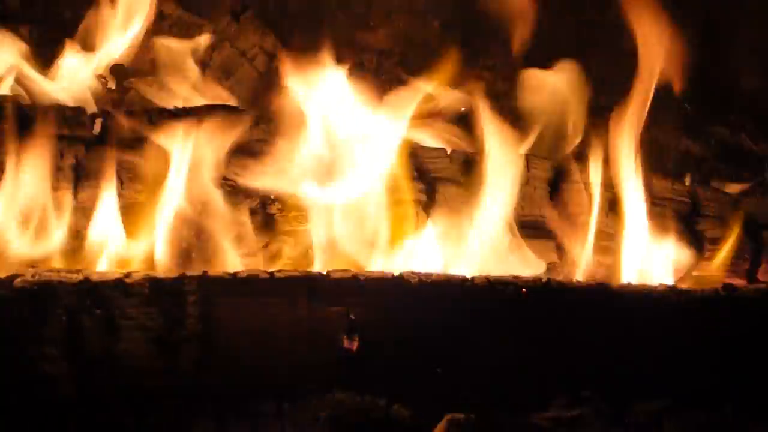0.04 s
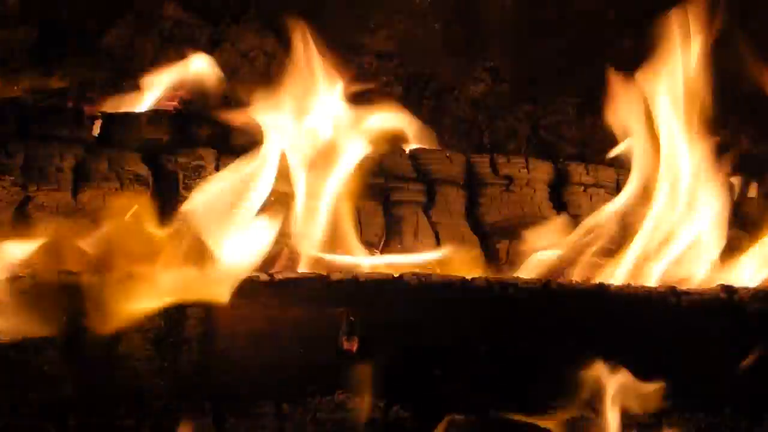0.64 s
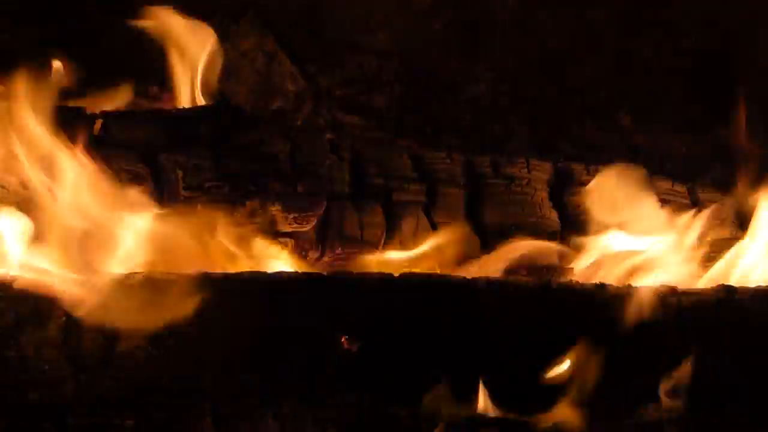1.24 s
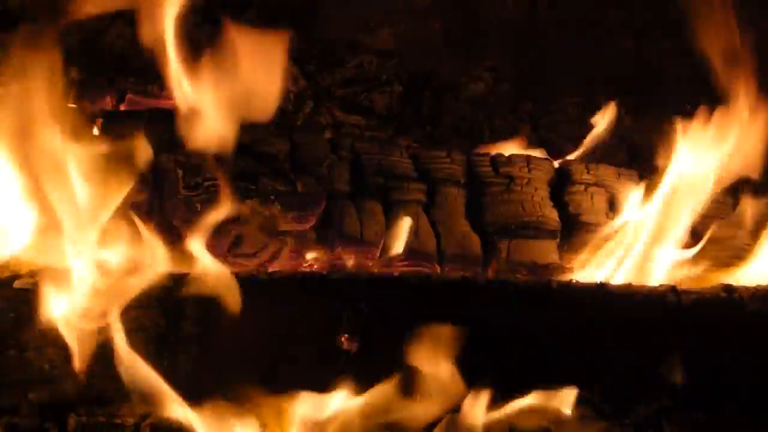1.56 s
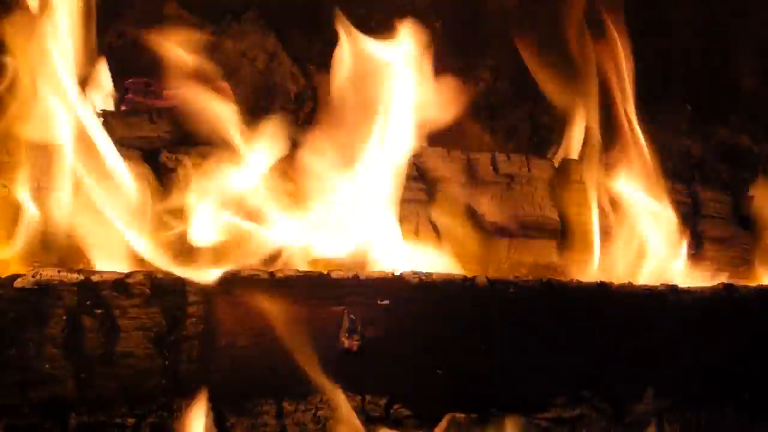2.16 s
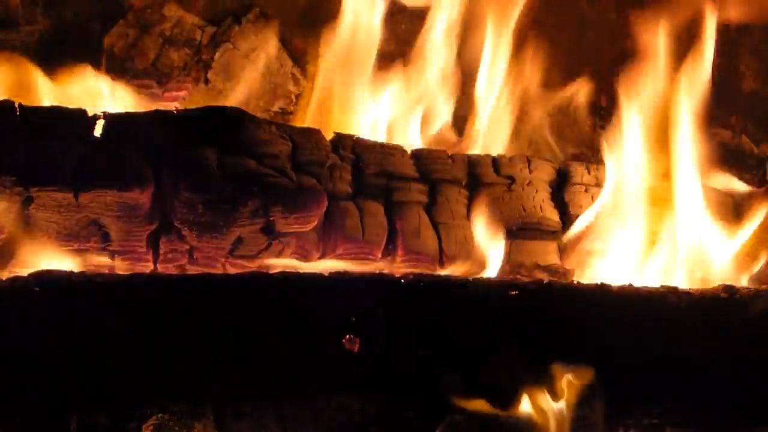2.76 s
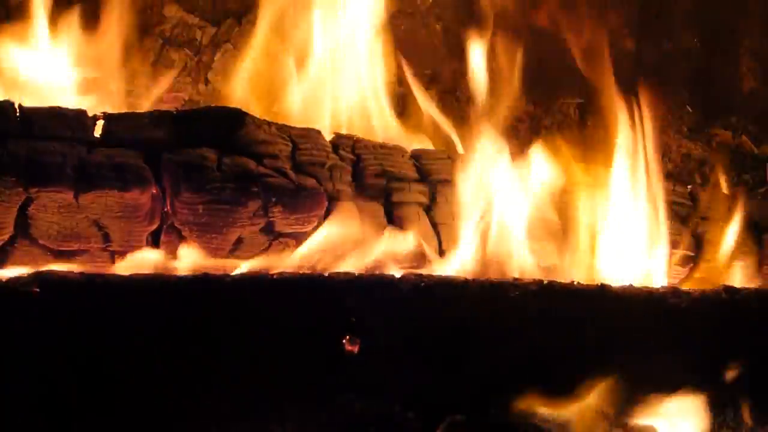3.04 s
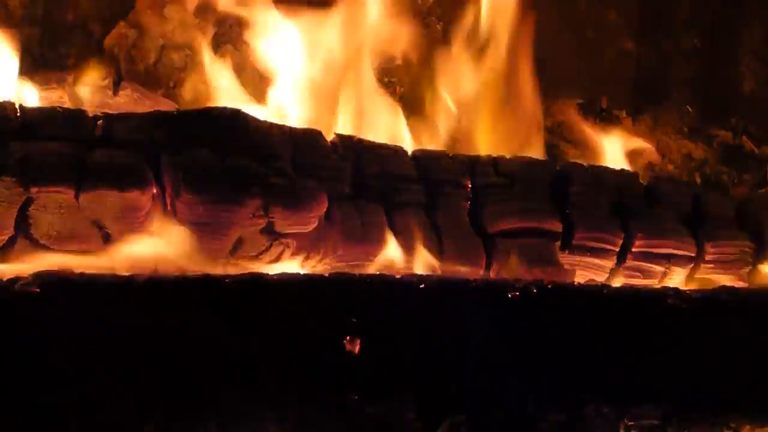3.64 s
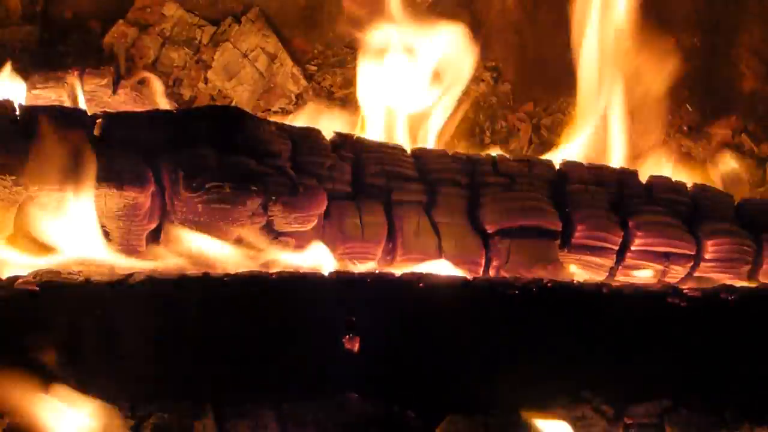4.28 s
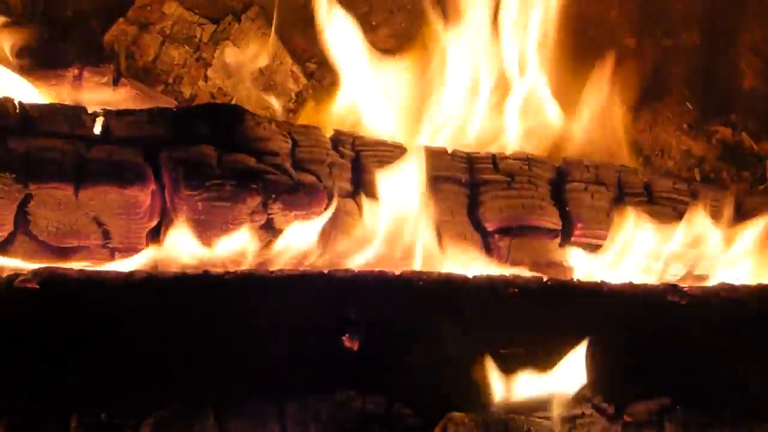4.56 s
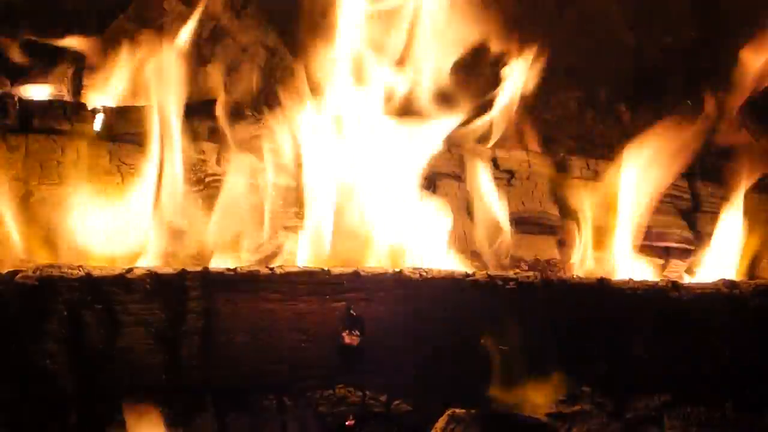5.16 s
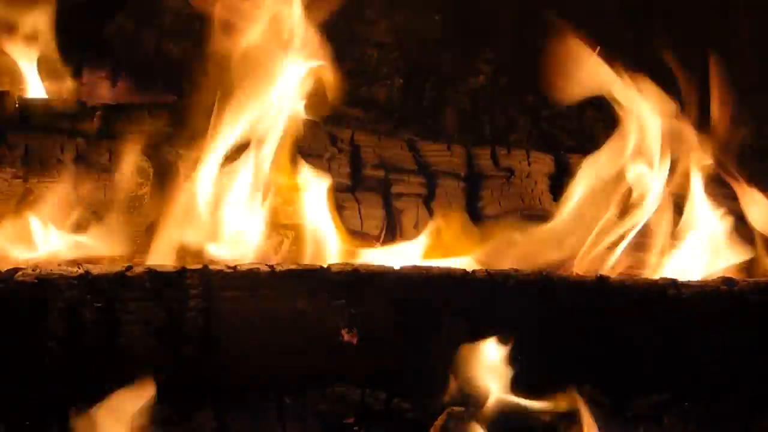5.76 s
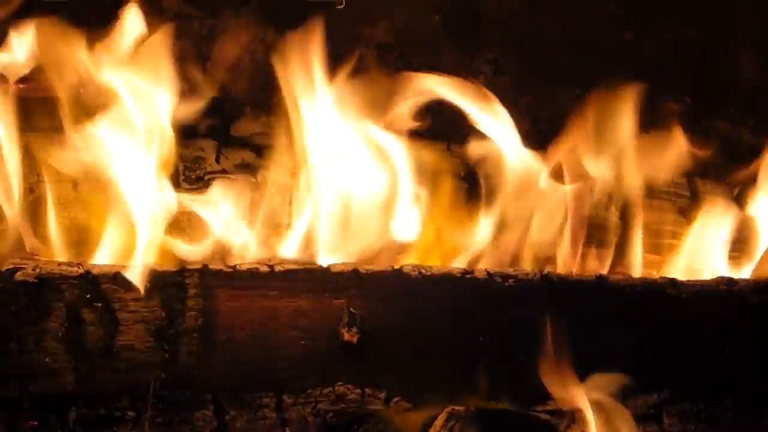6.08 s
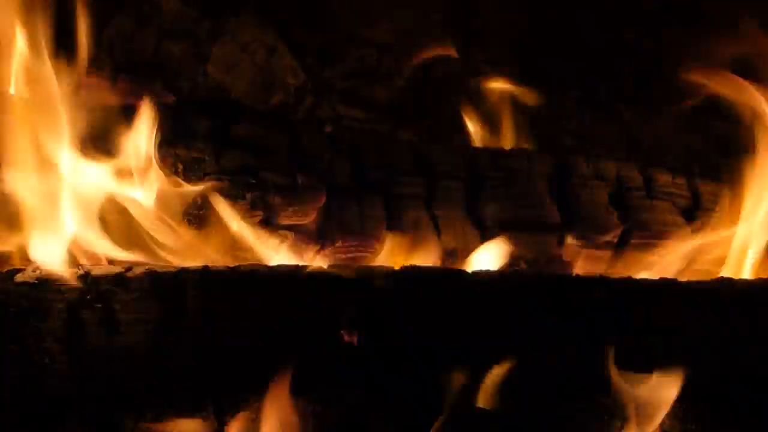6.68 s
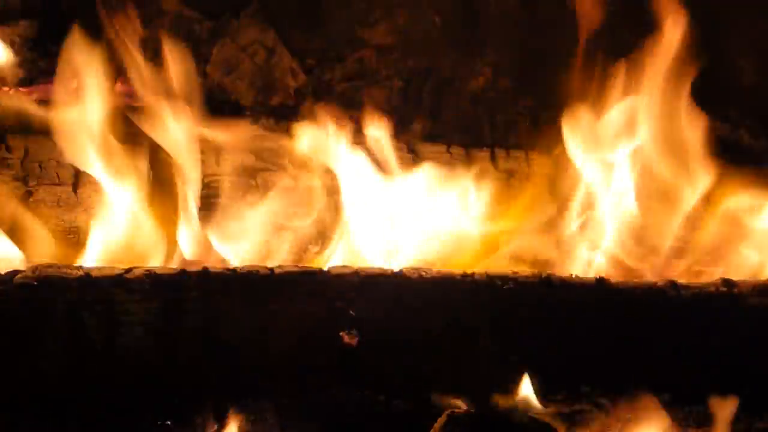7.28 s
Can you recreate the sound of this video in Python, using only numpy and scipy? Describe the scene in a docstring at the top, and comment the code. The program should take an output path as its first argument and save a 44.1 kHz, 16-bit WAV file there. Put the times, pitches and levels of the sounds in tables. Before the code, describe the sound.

Flames roar softly and flutter around burning logs in a hearth, heard from close by. Light, high crackles at the start give way to a loud snap, then a busier run of pops with short hisses of sap and a soft low drone. A second loud crack carries a dull wooden knock, and another cluster of snaps comes near the end. Faint ember ticks and a slight hum continue throughout.

```python
"""Sharp, dry pops snap out of a close log fire as pockets of steam burst in the wood.
Between them embers tick and boiling sap sizzles. Underneath lies the low roar of the flames,
with a soft drone that comes and goes and a faint hum like that of a fan.
The two loudest pops make the recorder's gain control duck the roar, which then creeps back."""
import sys
import numpy as np
from scipy import signal
from scipy.fft import rfft, irfft
from scipy.io import wavfile
from scipy.ndimage import uniform_filter1d

SR = 44100
rng = np.random.default_rng(int(sys.argv[2]) if len(sys.argv) > 2 else 0)


def to_wav(sig):
    """Store sig (one row per channel, or 1-D mono) as 16-bit WAV at the path in sys.argv[1].

    Samples outside -1..1 are clipped; the rate is SR.
    """
    pcm = np.clip(np.atleast_2d(sig), -1, 1) * 32767
    pcm = np.round(pcm).astype(np.int16)
    wavfile.write(sys.argv[1], SR, pcm.T)  # frames by channels


N = 322812
TIME = np.arange(N) / SR
FREQS = np.fft.rfftfreq(N, 1 / SR)
BURST_SAMPLES = 2048

# Slow rise and fall in the loudness of roar, hiss and ember ticks. Each row: time in seconds, gain in dB.
FIRE_LEVEL = [(0, -1.4), (.7, -1.86), (1.5, 0), (2.6, 1.6), (2.8, 1.5), (3.7, 0.6), (4.6, -1), (5.3, 0),
              (6, -0.26), (7.3, -0.9)]


def pops(spread_db=1.4, middling_db=-12.5, clean_hz=7400, deep_hz=1990):
    """Steam pockets burst, each from its own place in the logs: a sharp snap and a dull wooden knock."""
    # The pops that stand out. Each row: start in seconds, level in dB as if packed into a millisecond,
    # pitch in Hz, width in octaves, broadband click in dB relative to the resonance.
    steam_bursts = [(0.085, -37, 11900, 0.32, -22), (0.101, -33, 6300, 0.27, -15),
                    (0.1417, -41, 12300, .4, -22), (0.1827, -44, 12800, .3, -22),
                    (0.5275, -41, 11100, 0.54, -22), (0.5874, -40, 10500, 0.42, -24),
                    (0.7338, -19, 10900, 0.14, -32), (0.7595, -20, 12400, 0.45, -13.5),
                    (1.119, -50, 5600, .4, -14), (1.238, -41.5, 6840, 0.67, -22),
                    (1.2966, -44, 11700, .4, -22), (1.345, -41, 3500, .3, -10),
                    (1.3649, -45, 7100, 0.59, -22), (1.507, -44, 8400, .5, -22),
                    (1.5292, -45, 10300, .5, -22), (1.5669, -47, 6000, .6, -22),
                    (1.626, -41, 8800, 0.21, -22), (1.6825, -43, 9700, 0.76, -22),
                    (1.7205, -34.5, 7800, .22, -6), (1.727, -38, 10500, .4, -22),
                    (1.7745, -39.5, 7400, 0.6, -22), (1.8104, -43, 9500, .5, -22),
                    (1.8944, -41, 10000, .5, -22), (1.9155, -29, 10700, 0.43, -7),
                    (1.93, -35, 9100, .33, -6), (1.9587, -24, 11200, 0.15, -9),
                    (1.9615, -20.5, 10300, 0.45, -8), (1.9701, -40, 4800, .5, -22),
                    (2.105, -30.5, 10000, 0.46, -15), (2.1878, -38, 9200, .5, -22),
                    (2.21, -33, 6300, .22, -7), (2.3006, -43, 10100, 0.54, -22),
                    (2.3842, -35, 7900, .77, -22), (2.4771, -45, 10200, .5, -22),
                    (2.5126, -35, 6700, 0.58, -20), (2.5205, -19, 13900, 0.6, -20),
                    (2.6527, -3.5, 9950, 0.22, -16), (2.654, -9, 9900, 1.2, -17),
                    (2.7568, -40, 6500, .6, -22), (2.872, -32, 14500, 0.47, -8),
                    (3.014, -34.5, 5300, .22, -7.5), (3.0242, -33.5, 9900, 0.81, -29.5),
                    (3.0321, -41, 8400, .7, -22), (3.0539, -43, 7400, 0.22, -18),
                    (3.1541, -36, 13400, .28, -16.5), (3.2302, -31.5, 7400, 0.51, -28),
                    (3.3882, -40, 11100, .4, -22), (3.4086, -28.5, 8870, 0.45, -18),
                    (3.4722, -42, 9600, .6, -22), (3.512, -34.5, 11100, 0.72, -22),
                    (3.582, -26, 9100, 0.23, -15), (3.598, -35, 10500, .5, -20),
                    (3.6214, -20, 9050, 1, -16), (3.6309, -23, 11700, 0.83, -29),
                    (3.801, -20.5, 7360, 0.28, -16), (3.9, -35.5, 8100, 1.5, -33),
                    (4.1154, -38, 8400, 0.55, -18), (4.128, -31.5, 8320, .49, -9.5),
                    (4.151, -23, 6540, 0.26, -9), (4.17, -15, 8000, 0.61, -12),
                    (4.1765, -22, 10100, .74, -31), (4.2232, -39.5, 7000, 0.6, -22),
                    (4.2884, -42, 12300, 0.59, -22), (4.321, -24.5, 6740, 1.2, -40),
                    (4.3859, -41.5, 9800, 0.42, -22), (4.4418, -40, 8500, 0.54, -22),
                    (4.588, -32, 7500, 0.92, 1), (4.6425, -21.5, 6850, 0.23, -6),
                    (4.7757, -9.5, 2030, 0.76, -13), (4.7762, -7, 14900, 0.45, -7.5),
                    (4.8167, -36, 8300, 0.6, -26), (4.8671, -31, 7560, .43, -19),
                    (4.8874, -39, 11600, .5, -22), (4.905, -26, 7750, 1.2, -29),
                    (4.993, -20, 10900, 0.67, -16), (5.0174, -42.5, 7400, .5, -22),
                    (5.04, -29, 8500, 1, -30), (5.05, -33.5, 9500, 1.8, -25), (5.0592, -39, 6160, .49, -17),
                    (5.085, -37.5, 3320, 0.47, -19), (5.1407, -40, 11600, 0.43, -20),
                    (5.1973, -27.5, 4500, 0.61, -13.5), (5.2208, -43.5, 6900, .5, -22),
                    (5.3277, -40, 7100, .7, -22), (5.4308, -34, 6300, .41, -9),
                    (5.4583, -35.5, 9000, 0.59, -22.5), (5.6387, -37, 9600, 0.94, -22),
                    (5.65, -42, 8300, .7, -22), (5.7145, -35.5, 14500, 0.23, 0),
                    (5.8322, -45.5, 9500, 0.64, -24), (5.879, -45, 6900, .6, -22),
                    (6.001, -31.5, 12000, 0.9, -12), (6.2503, -26.5, 7600, 0.28, -15),
                    (6.286, -38.5, 10300, 0.55, -22), (6.318, -45, 7400, 0.54, -22),
                    (6.4686, -24, 11500, 0.79, -25), (6.4702, -23, 12300, 0.76, -25),
                    (6.477, -20, 11600, .42, -13), (6.497, -15.5, 8100, 0.42, -18.5),
                    (6.5133, -24.5, 10800, .42, -10), (6.5446, -32.5, 6500, 0.58, -14),
                    (6.6379, -45, 5700, .5, -22), (6.736, -38.5, 6100, 0.73, -20),
                    (6.7871, -12, 5340, 0.44, -16), (6.855, -36, 6700, 0.56, -20),
                    (6.988, -33.5, 11700, 0.14, -8), (7.0485, -35.5, 4900, 0.58, -13),
                    (7.1935, -44, 12000, .4, -22)]
    out = np.zeros((2, N))
    for start, db, hz, octaves, click_db in steam_bursts:
        pan = amp(spread_db * rng.uniform(-0.8, 1) * np.array([[1], [-1]]))
        noise = rng.standard_normal((2, 6, BURST_SAMPLES))
        # Above middling level, pops break more cleanly: half the tearing time for every 10 dB.
        tear_ms = 1.66 * 2 ** (min(middling_db - db, 0) / 10)
        # Small, high cavities tear raggedly; below clean_hz the crack grows more even.
        tear_db = max(-2 - 9 * max(np.log2(clean_hz / hz), 0), -6.5)
        snap = fracture(noise[0], db, hz, octaves, click_db, tear_ms, tear_db)
        knock_db = db - 13.5 - 18 * np.log2(hz / deep_hz)  # smaller cavities knock the log less
        knock = fracture(noise[1], knock_db, hz=540, octaves=0.77, click_db=-38, tear_ms=2.4)
        add(out, start, pan * (snap + knock))
    return out


def fracture(noise, db, hz, octaves, click_db, tear_ms, tear_db=2, tail_db=-7, tail_ms=4.45):
    """A clean break and its ragged tearing ring a cavity in the wood; the hearth scatters a short tail."""
    freqs = np.abs(np.fft.fftfreq(BURST_SAMPLES, 1 / SR)) + 1
    ms = np.arange(BURST_SAMPLES) * 1000 / SR
    gain = np.hypot(bell(freqs, hz, octaves), amp(click_db))
    gain *= freqs ** 2 / (freqs ** 2 + (0.1 * hz) ** 2)  # small cavities radiate little bass
    # Minimum phase: nothing sounds before the break.
    cavity = np.exp(np.conj(signal.hilbert(np.log(gain + 1e-5))))
    snap = unit(signal.unit_impulse(BURST_SAMPLES))
    # Tear and tail each take three rows of noise: centre, left, right.
    tear = np.sqrt(tear_ms) * unit((noise[0] + 0.34 * noise[1:3]) * np.exp(-ms / tear_ms))
    tail = unit((noise[3] + 0.33 * noise[4:6]) * np.exp(-ms / tail_ms))
    crack = snap + amp(tear_db) * tear + amp(tail_db) * tail
    sound = np.fft.ifft(np.fft.fft(crack) * cavity).real
    return amp(db) * unit(sound) / np.sqrt(ms[-1])


def wood_pings():
    """Strong pops leave the wood ringing briefly in a few damped tones."""
    # Wood resonances. Each row: start in seconds, pitch in Hz, opening level in dB, seconds to fall 60 dB.
    wood_modes = [(0.7346, 5950, -23.5, 0.023), (0.7329, 10360, -22, .014), (0.7597, 2720, -32, 0.0065),
                  (0.7595, 3860, -30, 0.005), (2.652, 1810, -22.5, 0.0083), (2.653, 2750, -26, 0.0079),
                  (2.6542, 3450, -14.5, 0.0062), (2.6526, 5250, -8.5, 0.0052), (3.801, 3730, -29.5, 0.0097),
                  (4.1697, 4500, -19.5, 0.012), (4.6424, 1650, -32, 0.016), (4.7766, 357, -26, 0.014),
                  (4.7766, 775, -27, .02), (4.7766, 1150, -22, 0.019), (4.777, 1660, -23, .014),
                  (4.7762, 2280, -15.5, 0.013), (6.497, 3770, -20, 0.0078), (6.4972, 5800, -22, 0.0097),
                  (6.4972, 9850, -14, 0.009), (6.5448, 4330, -38, .01), (6.7876, 1180, -32, 0.01),
                  (6.7876, 2200, -26, .006)]
    out = np.zeros((2, N))
    t = TIME[:BURST_SAMPLES]
    for start, hz, db, t60 in wood_modes:
        decay = amp(db - 60 * t / t60)
        add(out, start, (decay * np.sin(2 * np.pi * hz * t))[None])
    return out


def embers(count=900, faintest_db=-59.5, spread_db=4.0, pitch_hz=8400, range_octaves=2.05):
    """Tiny fractures tick in the char, each at its own pitch: most are faint, a few stand out."""
    out = np.zeros((2, N))
    for when, chance, tone, width in rng.random((count, 4)):
        start = when * N / SR
        db = faintest_db + spread_db * min(-np.log(chance), 3) + curve(FIRE_LEVEL, start)
        hz = pitch_hz * 2 ** (range_octaves * (tone - .5))
        noise = rng.standard_normal((6, BURST_SAMPLES))
        tick = fracture(noise, db, hz, octaves=0.36 * (.5 + width), click_db=-20, tear_ms=0.87)
        add(out, start, tick)
    return out


def sap(pitch_hz=11300, whistle_hz=8350, whistle_db=-5, bubbles_per_s=600):
    """Sap boils out of a crack: sprays of tiny bubbles, one for each size; a strong jet also whistles."""
    # Jets of boiling sap. Each row: peak time in seconds, length in seconds, level in dB.
    sap_jets = [(0.124, 0.14, -65), (1.83, 0.32, -64), (3.458, 0.051, -48.5), (3.579, 0.067, -44),
                (3.78, 0.4, -62), (4.17, .14, -63), (4.961, .25, -61)]
    jet = sum(swell(*row) for row in sap_jets)
    spray = 0
    for bubble_hz in np.geomspace(4000, 15000, 14):
        clicks = rng.standard_normal(N) * (rng.random(N) < bubbles_per_s / SR)
        bubbles = rfft(clicks) * bell(FREQS, bubble_hz, octaves=0.072)
        spray = spray + bubbles * bell(bubble_hz, pitch_hz, octaves=1.0)
    whistle = irfft(rfft(rng.standard_normal(N)) * bell(FREQS, whistle_hz, octaves=0.033), N)
    whistle_gain = amp(whistle_db) * jet / jet.max()
    return jet * (unit(irfft(spray, N)) + whistle_gain * unit(whistle))


def flames(roar_db=-45.5, hiss_db=-58.5, flutter_db=0.87, flicker_db=2.0, top_hz=4000, flap_s=0.18):
    """Turbulent roar and a thin hiss slowly rise and fall; tongues of flame rush and flap on top."""
    # Tone of the roar and of the escaping gas. Each row: frequency in Hz, relative level in dB.
    roar_spectrum = [(25, -17), (50, -16), (80, -16), (110, -15.5), (170, -0.5), (240, -1), (330, -7),
                     (530, -14.5), (850, -10.5), (1200, -9), (1650, -16), (2200, -14), (3150, -26),
                     (4100, -19.5)]
    hiss_spectrum = [(2500, -37), (4000, -2.5), (5500, 2), (8000, -0.5), (11000, -0.5), (15500, -5)]
    # Surging flames. Each row: peak time in seconds, length in seconds, level in dB, pitch in Hz.
    surges = [(1.5, 2.4, -59, 2680), (2.7, 1.7, -58, 2570), (4.752, 1.1, -60, 2870),
              (5.58, 0.75, -56.5, 2780), (5.946, 0.67, -60, 3570), (6.74, 4, -56.5, 2600)]
    # Low puffs as flames flap loose, about four a second. Each row: peak time in seconds, level in dB.
    puffs = [(.04, -43), (.39, -48), (.62, -51.5), (.88, -52), (1.16, -50.5), (1.41, -52.5), (1.65, -46.5),
             (2.07, -47), (2.28, -45), (2.59, -49), (2.97, -52), (3.22, -52), (3.46, -46.5), (3.68, -54),
             (3.91, -65), (4.19, -59), (4.47, -64), (4.69, -68), (4.95, -55), (5.3, -67), (5.57, -64),
             (5.8, -57), (6.08, -59), (6.38, -69), (6.63, -56), (6.88, -60), (7.18, -57)]
    rolloff = 1 / np.sqrt(1 + (FREQS / top_hz) ** 12)
    roar = stereo_noise(amp(spectrum(roar_spectrum)) * back_wall() * rolloff)
    hiss = stereo_noise(amp(spectrum(hiss_spectrum)))
    rush = 0
    for peak, length, db, pitch_hz in surges:
        band = bell(FREQS, pitch_hz, octaves=0.27) * back_wall() ** 2
        rush = rush + swell(peak, length, db) * stereo_noise(band)
    flap_level = sum(swell(peak, flap_s, db) for peak, db in puffs)
    flaps = flap_level * stereo_noise(bell(FREQS, centre_hz=132, octaves=0.46))
    roar *= amp(roar_db + flutter_db * wander(rate_hz=30))
    hiss *= amp(hiss_db + flicker_db * wander(rate_hz=67))
    return amp(curve(FIRE_LEVEL, TIME)) * (roar + hiss) + rush + flaps


def back_wall(delay_s=.00243, reflection=.17):
    """The back of the hearth returns the roar a moment later and ripples its spectrum."""
    return np.abs(1 + reflection * np.exp(-2j * np.pi * FREQS * delay_s))


def drone(pitch_hz=161.2, climb_hz_per_s=9.7, waver_db=0.5, unsteady_hz=1.62):
    """A soft, unsteady low tone comes and goes, climbing a little all the while."""
    # Swells of the drone. Each row: peak time in seconds, length in seconds, level in dB.
    swells = [(3.018, 0.88, -46.5), (3.73, 0.44, -47), (4.251, 0.54, -47.5), (4.918, 0.37, -54)]
    level = sum(swell(*row) for row in swells) * amp(waver_db * wander(rate_hz=11))
    hz = pitch_hz + climb_hz_per_s * (TIME - swells[0][0]) + unsteady_hz * wander(rate_hz=7.6)
    return np.sqrt(2) * level * np.sin(2 * np.pi * np.cumsum(hz) / SR)


def fan_hum(speed_drift=0.002458, waver_db=1.83, waver_step_s=.12):
    """A fan-like hum: its tones drift together with the speed and waver in level one by one."""
    # Tones of the hum. Each row: frequency in Hz, level in dB.
    tones = [(104, -62.5), (130, -57.5), (183, -57.5), (208, -59), (236, -52.5), (313, -65.5), (366, -70),
             (418, -79), (575, -69.5), (602, -67.5), (654, -70), (786, -70), (810, -61.5), (1098, -64),
             (1152, -76), (1228, -71.5), (1255, -63), (1465, -67)]
    # Slow rise and fall of the whole hum. Each row: time in seconds, gain in dB.
    hum_gain = [(0, 0.5), (2.4, 2.5), (3.5, 0), (5.3, 0.5), (7.3, 1.7)]
    clock = np.cumsum(1 + speed_drift * wander(rate_hz=1.41)) / SR
    steps = np.arange(0, N / SR + 1, waver_step_s)
    out = np.zeros(N)
    for hz, db in tones:
        level = amp(db + waver_db * rng.standard_normal(len(steps)))
        out += np.interp(TIME, steps, level) * np.sin(2 * np.pi * (hz * clock + rng.random()))
    return np.sqrt(2) * out * amp(curve(hum_gain, TIME))


def stereo_noise(gain):
    """Noise shaped by a gain at each of FREQS, partly alike at the two microphones."""
    # Stereo width of the flames. Each row: frequency in Hz, left-right likeness from 0 to 1.
    likeness = [(30, .55), (60, .6), (100, .78), (160, .95), (350, .95), (550, .76), (1000, .66),
                (1700, .62), (2500, .72), (4500, .6), (9000, .8)]
    # The upper mids lean to the right. Each row: frequency in Hz, left minus right in dB.
    balance = [(60, 1.3), (200, .3), (500, .8), (850, -1), (1100, -4.3), (1700, -7.3), (2500, -5),
               (3400, -1.5), (4200, -2.8), (6000, 0)]
    mid, side = rfft(rng.standard_normal((2, N)))
    alike = spectrum(likeness)
    mid, side = mid * np.sqrt(1 + alike), side * np.sqrt(1 - alike)
    lean = amp(spectrum(balance) / 2)
    channels = np.array([(mid + side) * lean, (mid - side) / lean])
    return unit(irfft(channels * gain, N))


def wander(rate_hz):
    """Smooth random motion of rms 1, with little change faster than the rate."""
    return unit(irfft(rfft(rng.standard_normal(N)) * np.exp(-(FREQS / rate_hz) ** 2), N))


def swell(peak_s, length_s, db):
    """A smooth bump of level, centred on a moment."""
    return amp(db) * np.exp(-(2 * (TIME - peak_s) / length_s) ** 2)


def bell(hz, centre_hz, octaves):
    """A resonance, bell-shaped on a log-frequency axis."""
    return np.exp(-(np.log2((hz + 1) / centre_hz) / octaves) ** 2 / 2)


def spectrum(points):
    """Values at FREQS, joining the points by straight lines on a log-frequency axis."""
    hz, value = np.transpose(points)
    return np.interp(np.log(FREQS + 1), np.log(hz + 1), value)


def curve(points, seconds):
    """A fader move: straight lines between points in time."""
    return np.interp(seconds, *np.transpose(points))


def add(mix, start_s, sound):
    """Lay a sound into the mix, cut off at the end."""
    part = mix[:, round(start_s * SR):][:, :sound.shape[1]]
    part += sound[:, :part.shape[1]]


def amp(db):
    """Decibels to amplitude."""
    return 10 ** (np.asarray(db) / 20)


def unit(x):
    """Scale to rms 1."""
    return x / np.sqrt(np.mean(x ** 2) + 1e-20)


def scene():
    """The bed of flames, hum and drone, with the crackle on top."""
    return flames() + fan_hum() + drone() + pops() + wood_pings() + embers() + sap()


def record(dry, threshold_db=-16.5, slope=0.49, recovery_db_per_s=3.5,
           notch_hz=9150, notch_width_hz=330, notch_db=-9, low_cut_hz=85, top_hz=15800):
    """Gain control with a slow recovery, the microphone's treble dip, overload, low cut and band limit."""
    power = uniform_filter1d((dry ** 2).mean(0), size=220)  # 5 ms average
    power_db = 10 * np.log10(np.abs(power) + 1e-12)
    recovery_db = TIME * recovery_db_per_s
    held_db = np.maximum.accumulate(power_db + recovery_db) - recovery_db  # peaks hold and sink slowly
    over_db = np.maximum(held_db - threshold_db, 0)
    duck_db = signal.lfilter([.002], [1, -.998], slope * over_db)  # 11 ms attack
    dip = amp(notch_db * np.exp(-((FREQS - notch_hz) / notch_width_hz) ** 2))
    heard = irfft(rfft(dry * amp(-duck_db)) * dip, N)
    heard = np.clip(heard, -1, 1)
    heard = signal.sosfilt(signal.butter(2, low_cut_hz, "high", fs=SR, output="sos"), heard)
    band_limit = signal.firwin(255, top_hz, window=("kaiser", 8), fs=SR)
    return signal.oaconvolve(heard, band_limit[None], "same")


dry = scene()
out = record(dry)
to_wav(out)
```